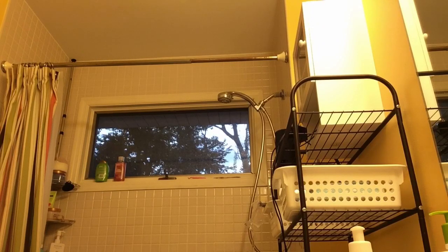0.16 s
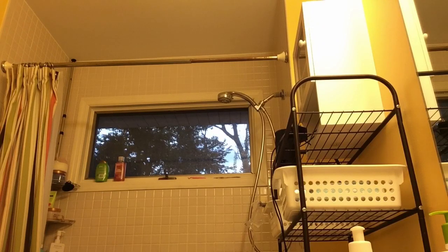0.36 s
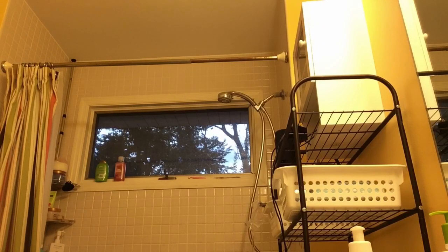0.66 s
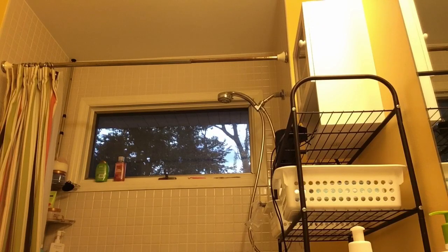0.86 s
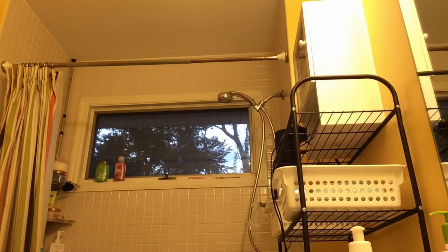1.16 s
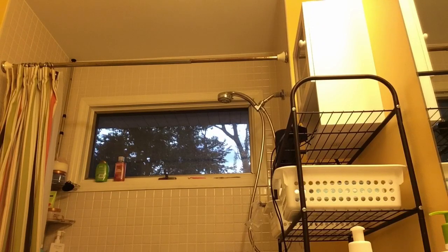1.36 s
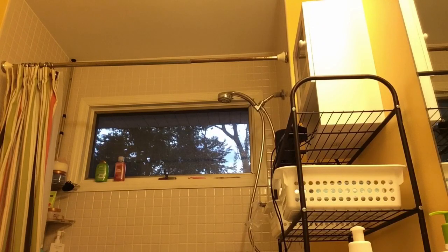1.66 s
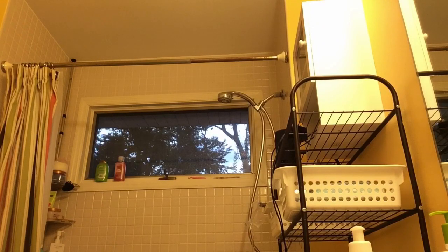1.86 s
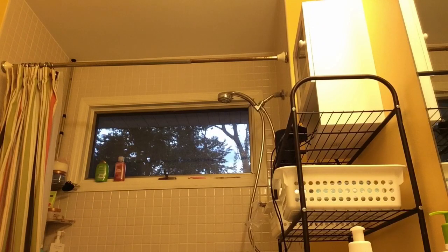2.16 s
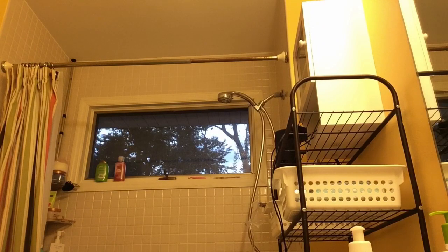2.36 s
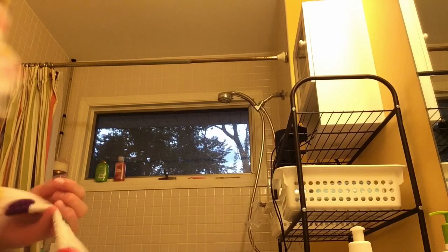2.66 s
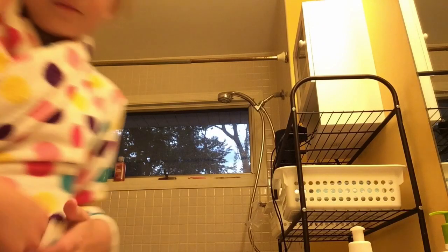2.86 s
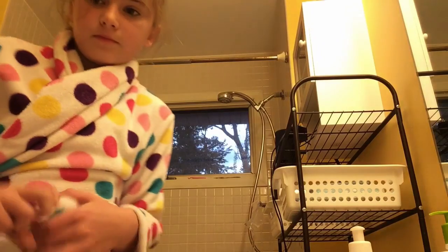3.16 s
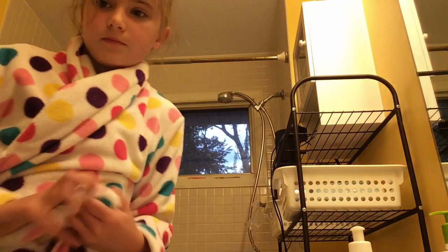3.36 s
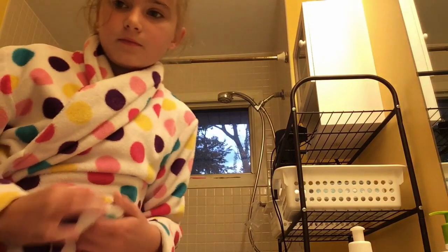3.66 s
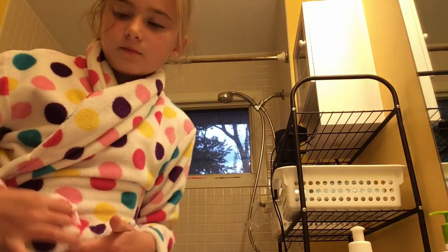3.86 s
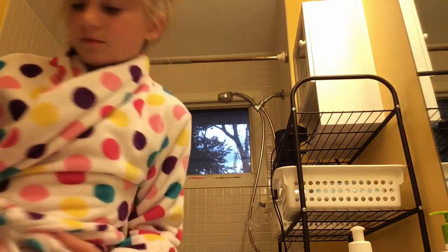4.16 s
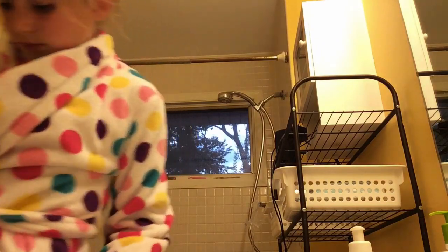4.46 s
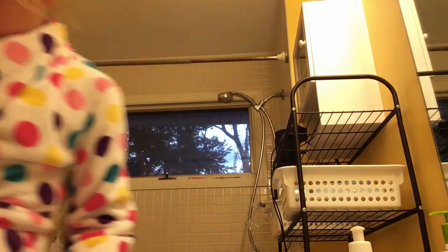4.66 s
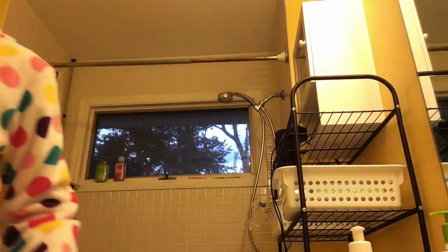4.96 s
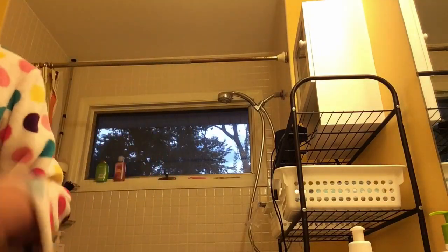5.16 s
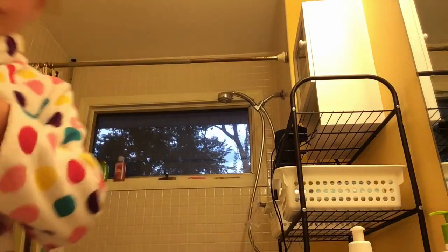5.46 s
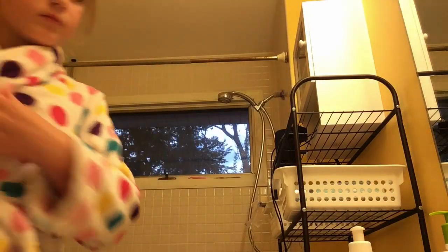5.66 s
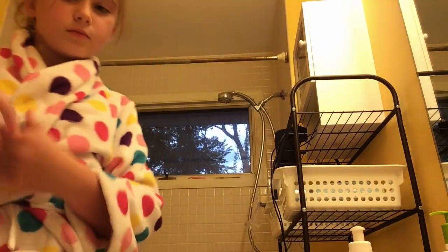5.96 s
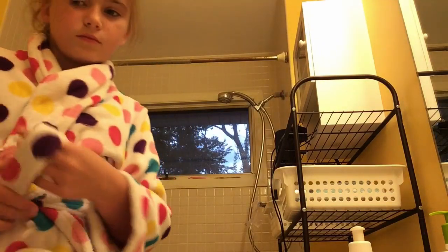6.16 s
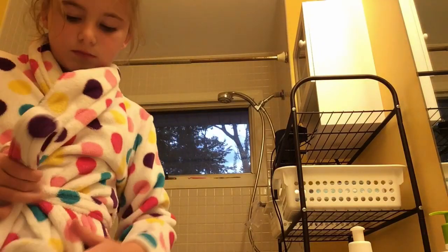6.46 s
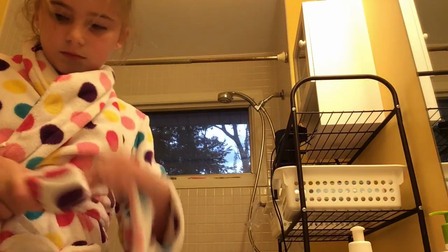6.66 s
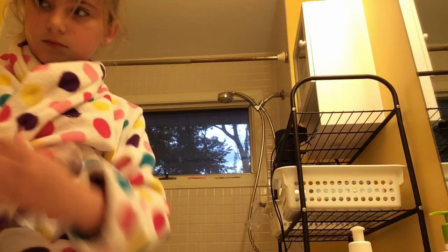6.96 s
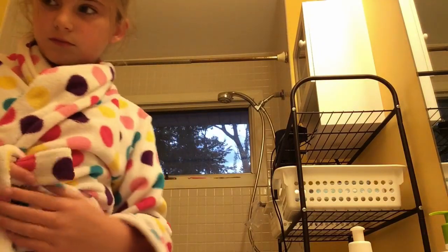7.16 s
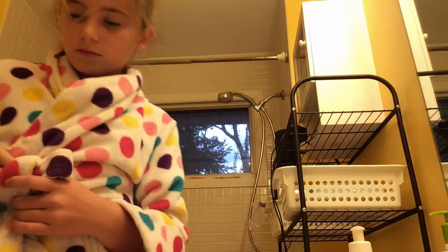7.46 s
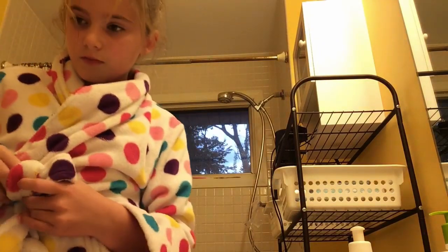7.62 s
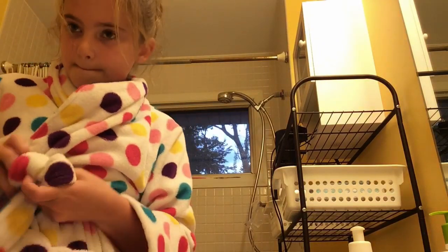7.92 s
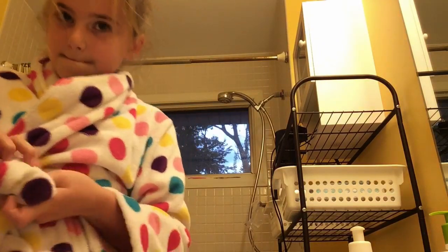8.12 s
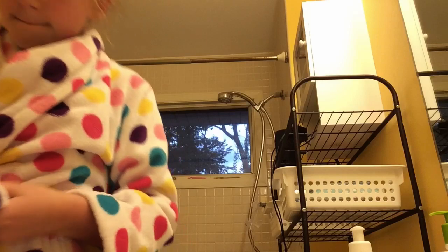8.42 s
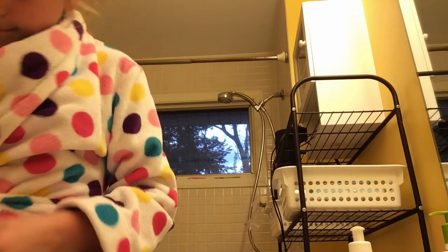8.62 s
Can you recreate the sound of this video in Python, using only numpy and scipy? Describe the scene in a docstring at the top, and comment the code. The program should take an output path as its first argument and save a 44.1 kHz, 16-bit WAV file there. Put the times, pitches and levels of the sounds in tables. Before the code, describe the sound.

A small motor fan hums steadily in a tiled bathroom as a soft robe rustles, something creaks and clacks, then a heavy bump thumps near the microphone.

```python
"""Bathroom fan, robe and a bumped camera

A small fan motor hums in a tiled bathroom: wavering sine tones over filtered noise of air and hiss.
Someone moves in a soft robe (swelling noise): a short creak of slips rings panel modes, two gliding
tones squeak, filtered contacts give bright plastic clacks and two dull, door-like thuds, grit bursts
tick. Near the end the camera is bumped: case noise scrapes, shelf modes thump, a tiny spring rings
and the gain control ducks."""
import sys
import numpy as np
from scipy import signal
from scipy.fft import rfft, irfft
from scipy.io import wavfile
from scipy.ndimage import uniform_filter1d, minimum_filter1d, map_coordinates

SR = 44100
rng = np.random.default_rng(int(sys.argv[2]) if len(sys.argv) > 2 else 0)


def to_wav(s):
    """Save 16-bit WAV."""
    ch = np.atleast_2d(s).T  # columns
    pcm = np.round(np.clip(ch, -1, 1) * 32767)  # PCM
    wavfile.write(sys.argv[1], SR, pcm.astype(np.int16))


N = 387638
TIME = np.arange(N) / SR
FREQS = np.maximum(np.arange(N + 1) * SR / (2 * N), 1)


def from_db(db):
    """Decibels to amplitude gain."""
    return 10 ** (np.asarray(db) / 20)


def rms_one(x):
    """Scale to unit power."""
    return x / np.sqrt(np.mean(x ** 2) + 1e-20)


def at_hz(points, hz):
    """Interpolate a table along log frequency."""
    table_hz, value = np.transpose(points)
    return np.interp(np.log(hz), np.log(table_hz), value)


def lowpass(x, hz):
    """Second-order low-pass."""
    return signal.sosfilt(signal.butter(2, hz, fs=SR, output="sos"), x)


def highpass(x, hz, order):
    """Butterworth high-pass."""
    return signal.sosfilt(signal.butter(order, hz, "high", fs=SR, output="sos"), x)


def colour(x, spectrum, resonances=()):
    """Minimum-phase (causal) filter: broad spectrum plus resonant peaks."""
    db = at_hz(spectrum, FREQS)
    for hz, width_hz, peak_db in resonances:
        db = db + peak_db / (1 + (2 * (FREQS - hz) / width_hz) ** 2)
    # folding the cepstrum onto positive time makes the phase minimal
    cepstrum = irfft(np.log(from_db(db)))
    cepstrum[1:N] *= 2
    cepstrum[N + 1:] = 0
    response = np.exp(rfft(cepstrum))
    return irfft(rfft(x, 2 * N) * response)[:N]


def noise(spectrum, resonances=()):
    """Steady coloured noise of unit power."""
    return rms_one(colour(rng.standard_normal(N), spectrum, resonances))


def burst(decay_s):
    """Exponentially decaying noise of unit energy."""
    length = SR // 4
    x = rng.standard_normal(length) * np.exp(-TIME[:length] / decay_s)
    return x / np.sqrt(np.sum(x ** 2))


def drift(rate_hz):
    """Smooth random curve of unit rms, with rate_hz random knots per second."""
    knots = rng.standard_normal(2000)
    curve = map_coordinates(knots, [TIME[::100] * rate_hz], mode="wrap")
    return rms_one(curve).repeat(100)[:N]


def tap(s, db, dull_hz=None):
    """One contact impulse; a soft contact is low-passed."""
    x = np.full(N, 1e-18)
    x[int(s * SR)] = from_db(db)
    return x if dull_hz is None else lowpass(x, min(dull_hz, SR / 2 - 1000))


def ring(force, modes):
    """Modal resonators: each answers a unit tap with a decaying sine."""
    out = np.zeros(N)
    for hz, db, t60_s in modes:
        radius = np.exp(-np.log(1000) / (t60_s * SR))
        angle = 2 * np.pi * hz / SR
        poles = [1, -2 * radius * np.cos(angle), radius ** 2]
        out += from_db(db) * signal.lfilter([0, np.sin(angle)], poles, force)
    return out


def swells(strokes):
    """Gain curve: a Gaussian bell per (peak time [s], level [dB], half-length [s])."""
    return sum(from_db(db) * np.exp(-((TIME - s) / half_s) ** 2) for s, db, half_s in strokes)


# shaft (42 Hz) and magnetic (120 Hz) multiples, sums and differences: (frequency [Hz], rms level [dB])
MOTOR_TONES = [(42.06, -68), (78.0, -58), (120.0, -79), (126.1, -58), (162.1, -51), (204.1, -63.5),
               (210.1, -64), (240.0, -58), (246.2, -63.5), (282.1, -60), (324.0, -56), (360.0, -52),
               (366.1, -68), (408.3, -76), (420.5, -52.5), (450.2, -54), (528.2, -60), (534.3, -55),
               (540.0, -53), (570.2, -65), (612.4, -53), (618.4, -54), (841.6, -68)]
# rush of air: (frequency [Hz], relative density [dB/Hz])
AIR_SPECTRUM = [(25, -34.5), (70, -21), (98, -25.5), (140, 2), (190, -0.5), (260, -11), (350, -3.5),
                (610, -7), (680, -23.5), (1130, -20), (1550, -39), (2700, -45.5), (6000, -67.5),
                (15500, -59)]
# fan housing resonances: (frequency [Hz], width [Hz], peak [dB])
HOUSING_RESONANCES = [(427.7, 14, 5.5), (667, 89, 7), (799, 17, 9), (1039, 18, 9), (1128, 10, 5.5),
                      (1444, 14, 13.5)]
# hiss at the grille: (frequency [Hz], relative density [dB/Hz])
HISS_SPECTRUM = [(1000, -4), (1600, -8.5), (1850, 1.5), (2200, -2.5), (2400, 0.5), (2820, 1), (3450, -5.5),
                 (4400, -2.5), (4750, -8), (7600, -15.5), (8400, -10.5), (12500, -19), (15700, -26)]
# narrow grille resonances: (frequency [Hz], width [Hz], peak [dB])
GRILLE_RESONANCES = [(1865, 40, 4), (2000, 50, 5), (2360, 60, 5), (2470, 50, 3), (2810, 70, 6),
                     (3150, 40, 5), (3875, 40, 4), (4440, 90, 4), (5780, 40, 8)]
AIR_DB, HISS_DB = -41.5, -61.5


def fan(waver_db=1.44, sway_rad_at_100_hz=0.21, flutter=0.07):
    """Motor tones waver in level and sway in phase over rushing air; the hiss flutters at 120 Hz."""
    sway = sway_rad_at_100_hz * drift(1.51)
    hum = np.zeros(N)
    for hz, db in MOTOR_TONES:
        level = from_db(db + waver_db * drift(5)) * np.sqrt(2)
        phase = 2 * np.pi * (hz * TIME + rng.random()) + sway * hz / 100
        hum += level * np.sin(phase)
    air = from_db(AIR_DB) * noise(AIR_SPECTRUM, HOUSING_RESONANCES)
    hiss = from_db(HISS_DB) * noise(HISS_SPECTRUM, GRILLE_RESONANCES)
    return hum + air + hiss * (1 + flutter * np.sin(2 * np.pi * 120 * TIME))


# someone moving shifts two standing waves: (time [s], level near 430 Hz [dB], level near 612 Hz [dB])
STANDING_WAVES = [(0, -1, -1), (2.8, -0.5, 1.5), (5.1, 0.5, -5), (5.55, 7, -5), (6.1, 2.5, -5.5),
                  (8.79, 4, -4.5)]


def standing_waves(x, centres_hz=(430, 612), width_hz=60):
    """Two narrow bands swell or sink as the room's standing-wave pattern shifts."""
    s, *columns = np.transpose(STANDING_WAVES)
    for hz, db in zip(centres_hz, columns):
        band = signal.lfilter(*signal.iirpeak(hz, hz / width_hz, fs=SR), x)
        x = x + (from_db(np.interp(TIME, s, db)) - 1) * band
    return x


# robe swishes, one per movement: (peak time [s], level [dB], half-length [s])
ROBE_SWISHES = [(1.6, -71, .1), (3.05, -77, 0.19), (3.88, -66, .05), (4.18, -69, .05), (4.56, -65, 0.15),
                (4.87, -64, .1), (6.6, -76, .1), (8.58, -68.5, 0.046), (8.75, -78, 0.094)]
# fleece: (frequency [Hz], relative density [dB/Hz])
FLEECE_SPECTRUM = [(1500, -2), (4000, -2), (9000, -4), (15500, -6)]
# brief duller scuffs: (peak time [s], level [dB], half-length [s])
ROBE_SCUFFS = [(2.15, -59.5, 0.018), (5.783, -49, 0.017), (6.17, -59, 0.014)]
# scuffs and handled belt: (frequency [Hz], relative density [dB/Hz])
SCUFF_SPECTRUM = [(400, -8), (1100, -2), (2400, 4), (4200, -5), (6500, -18), (15500, -28)]
FIDGET_FROM_S, FIDGET_FADE_S, FIDGET_DB = 4.76, 0.33, -77


def robe(grain_db=2.0, restless_db=2, belt_db=4):
    """Fleece sliding on itself hisses unevenly with each movement; scuffs and the handled belt are duller."""
    fade_in = np.clip((TIME - FIDGET_FROM_S) / FIDGET_FADE_S, 0, 1)
    fidget = from_db(FIDGET_DB + restless_db * drift(7)) * fade_in
    bright = (swells(ROBE_SWISHES) + fidget) * noise(FLEECE_SPECTRUM)
    dull = (swells(ROBE_SCUFFS) + from_db(belt_db) * fidget) * noise(SCUFF_SPECTRUM)
    return (bright + dull) * from_db(grain_db * drift(40))


CREAK_START_S, CREAK_LENGTH_S, CREAK_DB = 3.844, 0.043, -4.5
SLIP_HZ, SLIP_JITTER_PERIODS, LOAD_DB_PER_S = 199.3, 0.095, 99


def slips(uneven_db=4.5, count=16):
    """Stick-slip events (time [s], level [dB]): jittered in time, on average harder as the load builds."""
    chance = rng.standard_normal((count, 2))
    ages_s = np.abs(np.arange(count) + SLIP_JITTER_PERIODS * chance[:, 0]) / SLIP_HZ
    return [(CREAK_START_S + age, CREAK_DB + LOAD_DB_PER_S * age + uneven_db * luck)
            for age, luck in zip(ages_s, chance[:, 1]) if age < CREAK_LENGTH_S]


# wooden panel modes: (frequency [Hz], level [dB], t60 [s])
PANEL_MODES = [(193, -37, 0.044), (306, -27.5, 0.088), (399, -22, 0.083), (610, -29.5, 0.069),
               (900, -33, 0.036)]


def creak(dull_hz=650, thin_hz=110, grit_db=-30):
    """Soft, gritty slips shake a wooden panel too small to radiate deep bass."""
    run = slips()
    panel = ring(sum(tap(s, db, dull_hz) for s, db in run), PANEL_MODES)
    grit_force = sum(tap(s, db, 4000) for s, db in run)
    grit = signal.fftconvolve(grit_force, burst(0.0064))[:N]
    return highpass(panel + from_db(grit_db) * grit, thin_hz, 2)


# rubbed squeaks: (peak time [s], frequency [Hz], level [dB], half-length [s])
SQUEAK_EVENTS = [(4.408, 3290, -52.5, 0.007), (4.495, 3110, -43, 0.011)]


def squeaks(overtone_db=-25, glide=0.0088):
    """Something smooth is rubbed: brief tones sag in pitch, each with one overtone."""
    out = np.zeros(N)
    for s, hz, db, half_s in SQUEAK_EVENTS:
        age = (TIME - s) / half_s
        phase = 2 * np.pi * hz * half_s * (age - glide * age ** 2 / 2)
        tone = np.sin(phase) + from_db(overtone_db) * np.sin(2 * phase)
        out += from_db(db) * np.exp(-age ** 2) * tone
    return out


# contacts, bright plastic clacks and two dull, door-like thuds (low-passed at 300-350 Hz):
# (time [s], relative level [dB], low-pass [Hz], high-pass [Hz])
CLACK_AND_THUD_CONTACTS = [(5.1687, 5, 14500, 200), (5.209, 5, 350, 100), (5.334, 1, 300, 80),
                           (8.126, -8, 11000, 1300)]
# shared body colour: (frequency [Hz], gain [dB])
CONTACT_SPECTRUM = [(40, -12), (120, 3), (230, 3.5), (600, 3), (750, 2.5), (1050, 1.5), (1500, -6.5),
                    (2400, -2.5), (3300, -3.5), (4200, 1.5), (7000, -13.5), (8400, -7), (11500, -16),
                    (15500, -12)]
# shared resonances: (frequency [Hz], width [Hz], peak [dB])
CONTACT_RESONANCES = [(608, 40, 4), (955, 50, 3), (1800, 50, 2), (2430, 150, 11), (2780, 90, 8),
                      (3600, 80, 9), (4070, 80, 6), (5780, 120, 2), (8260, 200, 6), (14100, 400, 8)]
EDGE_LEAD_S, EDGE_DB = 0.0038, -16  # an edge touches just before the whole face lands


def clacks_and_thuds(gain_db=1, crunch=1.95, crunch_s=0.0051):
    """Each contact lands edge first and crunches for milliseconds; its low-pass makes it clack or thud."""
    force = np.zeros(N)
    for s, db, dull_hz, thin_hz in CLACK_AND_THUD_CONTACTS:
        edge = tap(s - EDGE_LEAD_S, db + EDGE_DB, dull_hz)
        face = tap(s, db, dull_hz)
        force += highpass(edge + face, thin_hz, 1)
    force = force + crunch * signal.fftconvolve(force, burst(crunch_s))[:N]
    return from_db(gain_db) * colour(force, CONTACT_SPECTRUM, CONTACT_RESONANCES)


# tiny dry ticks close by: (time [s], level [dB], low-pass [Hz], high-pass [Hz])
TICK_CONTACTS = [(5.4885, -30, 15000, 8000), (6.166, -33, 14000, 3000), (7.9784, -6, 4300, 4300),
                 (8.005, -16, 6900, 3500), (8.246, -14, 15000, 8500)]


def ticks(snap_s=0.001):
    """Each high-passed contact sets off bright grit with a 1 ms decay constant."""
    force = sum(highpass(tap(s, db, dull_hz), thin_hz, 2) for s, db, dull_hz, thin_hz in TICK_CONTACTS)
    return signal.fftconvolve(force, burst(snap_s))[:N]


# camera bumps on the shelf: (second contact time [s], its relative level [dB], low-pass [Hz],
# first contact relative to second [dB down, negative is louder], loss per rock [dB])
CAMERA_BUMPS = [(8.000, 3.5, 166, 7, 8.5), (8.146, 5, 910, 34, 1.2), (8.248, -2, 700, -2.5, 3)]
ROCK_S, ROCKS = 0.026, 6
ROCK_SOFTENS, SOFTEST_HZ = 0.28, 170  # share of low-pass offset from SOFTEST_HZ kept per rock


def knocks():
    """Each bump: an early contact, a second blow, then decaying rocks: (time [s], level [dB], low-pass [Hz])."""
    for s, db, dull_hz, first_down_db, loss_db in CAMERA_BUMPS:
        yield s - ROCK_S, db - first_down_db, dull_hz
        for k in range(ROCKS):
            rock_hz = SOFTEST_HZ + (dull_hz - SOFTEST_HZ) * ROCK_SOFTENS ** k
            yield s + k * ROCK_S, db - k * loss_db, rock_hz


# heavy landing that rings the shelf: (time [s], level [dB])
HEAVY_LANDING = (8.1476, 0)
# low shelf modes: (frequency [Hz], level [dB], t60 [s])
SHELF_MODES = [(64.9, -11, 0.56), (130.7, -15, 0.53), (170.8, -12.5, 0.34), (560, -9, 0.22),
               (594, -18, 0.13), (864, -10.5, 0.067)]
# the shelf's many short-lived modes together: (frequency [Hz], gain [dB])
SHUDDER_SPECTRUM = [(25, -29), (70, 22), (100, 10.5), (160, 20.5), (245, 18), (330, 13), (480, 12.5),
                    (610, 22.5), (720, -4), (1050, 12.5), (1500, -3), (4000, -18)]


def thump(shudder_db=13, shudder_s=0.014):
    """Each knock gives a dense, brief shudder; the heavy landing rings the shelf modes."""
    rocking = np.zeros(N)
    for s, db, dull_hz in knocks():
        shake = lowpass(burst(shudder_s), dull_hz)
        start = int(s * SR)
        rocking[start:start + len(shake)] += from_db(db) * shake
    shelf = ring(tap(*HEAVY_LANDING, dull_hz=2500), SHELF_MODES)
    return shelf + from_db(shudder_db) * colour(rocking, SHUDDER_SPECTRUM)


# slides of the camera case: (peak time [s], level [dB], rise [dB/s])
CASE_SLIDES = [(8.007, -38.5, 478), (8.125, -19, 1402)]
# sliding case: (frequency [Hz], relative density [dB/Hz])
CASE_SPECTRUM = [(200, 11), (500, 17), (1000, 9), (1600, -1), (2800, -3), (4200, -0.5), (7200, -8),
                 (9000, -6.5), (11000, -14.5), (15500, -19)]
SLIDE_FALL_DB_PER_S = 270


def scrape(grain_db=3):
    """The case breaks loose, slides in tiny jerks and is braked by friction."""
    speed = np.zeros(N)
    for s, db, rise_db_per_s in CASE_SLIDES:
        rise = rise_db_per_s * (TIME - s)
        fall = SLIDE_FALL_DB_PER_S * (s - TIME)
        speed += from_db(db + np.minimum(rise, fall))
    return speed * noise(CASE_SPECTRUM) * from_db(grain_db * drift(200))


# jolts of a tiny spring inside the camera: (time [s], level [dB])
SPRING_JOLTS = [(8.154, -3), (8.245, -17)]
# spring modes: (frequency [Hz], level [dB], t60 [s])
SPRING_MODES = [(7500, -45, 0.56), (9260, -31, 0.14), (12060, -28.5, 0.17)]


def spring():
    """Jolts ring the spring's high modes."""
    return ring(sum(tap(s, db) for s, db in SPRING_JOLTS), SPRING_MODES)


# room decay: (frequency [Hz], t60 [s])
ROOM_DECAY = [(60, 0.69), (250, 0.67), (600, 0.42), (1500, 0.23), (4000, 0.23), (9000, 0.24), (16000, 0.16)]


def tiled_room(build_s=0.0021):
    """Dense echoes off close tiles: band noise with per-band decay, unit total energy."""
    t = TIME[:SR]
    edges_hz = np.geomspace(40, 18000, 13)
    tail = np.zeros(SR)
    for low, high in zip(edges_hz, edges_hz[1:]):
        band_pass = signal.butter(2, [low, high], "band", fs=SR, output="sos")
        band = signal.sosfilt(band_pass, rng.standard_normal(SR))
        t60_s = at_hz(ROOM_DECAY, np.sqrt(low * high))
        tail += band * np.exp(-np.log(1000) * t / t60_s)
    tail = tail * (1 - np.exp(-t / build_s))
    return tail / np.sqrt(np.sum(tail ** 2))


def scene(clack_wet_db=-3.5, thump_wet_db=-13, scrape_wet_db=-6, near_wet_db=-11, creak_wet_db=-14):
    """Mix: each contact sound has its own echo send; fan, robe and spring get no added echo."""
    sources = [(creak(), creak_wet_db), (ticks() + squeaks(), near_wet_db),
               (clacks_and_thuds(), clack_wet_db), (thump(), thump_wet_db), (scrape(), scrape_wet_db)]
    direct = sum(x for x, _ in sources)
    send = sum(from_db(wet_db) * x for x, wet_db in sources)
    echoes = signal.fftconvolve(send, tiled_room())[:N]
    return (standing_waves(fan()) + robe() + direct + spring() + echoes)[None]


CUTOFF_HZ = 15800


def record(dry, low_cut_hz=45, threshold_db=-18, squeeze=0.26, attack_s=0.038, release_db_per_s=20,
           hold_s=0.23):
    """Microphone cuts deep bass; gain control ducks, holds, recovers; peaks are rounded, the top is cut."""
    heard = highpass(dry, low_cut_hz, 4)
    power = uniform_filter1d(heard[0] ** 2, size=882)  # 20 ms window
    loud_db = 10 * np.log10(np.maximum(power, 1e-12))
    over_db = squeeze * np.maximum(loud_db - threshold_db, 0)
    half_hold = int(hold_s * SR / 2)
    held_db = -minimum_filter1d(-over_db, 2 * half_hold + 1, origin=half_hold)
    # a running maximum on a tilted axis limits the release slope
    release_db = release_db_per_s * TIME
    duck_db = np.maximum.accumulate(held_db + release_db) - release_db
    lag = np.exp(-1 / (attack_s * SR))
    smooth_duck_db = signal.lfilter([1 - lag], [1, -lag], duck_db)
    rounded = 1.3 * np.tanh(heard * from_db(-smooth_duck_db) / 1.3)
    return signal.sosfilt(signal.ellip(12, 0.1, 90, CUTOFF_HZ, fs=SR, output="sos"), rounded)


dry = scene()
out = record(dry)
to_wav(out)
```